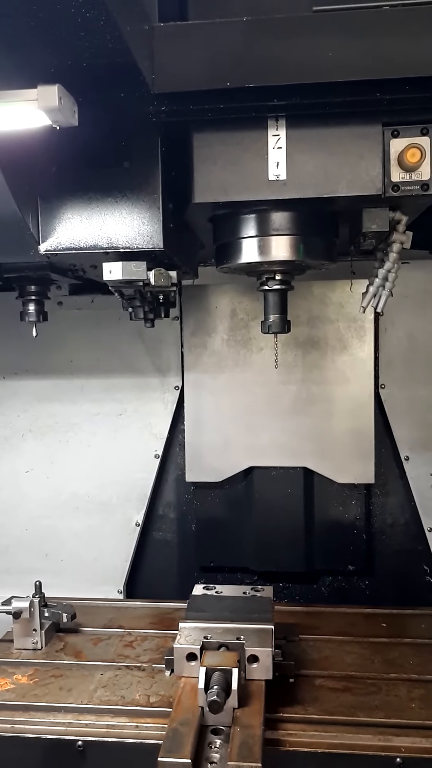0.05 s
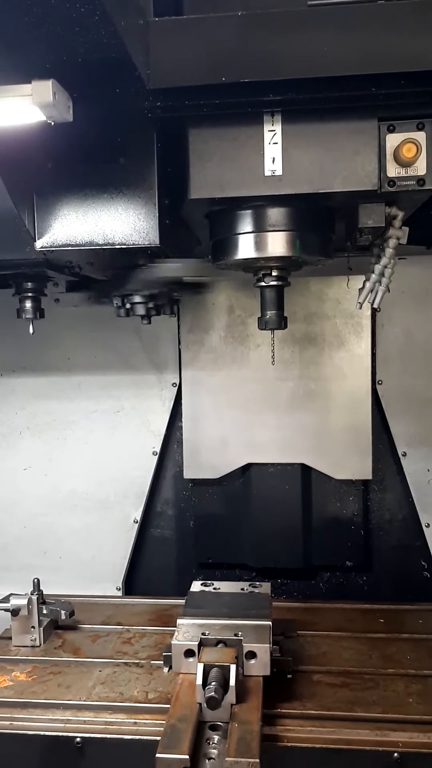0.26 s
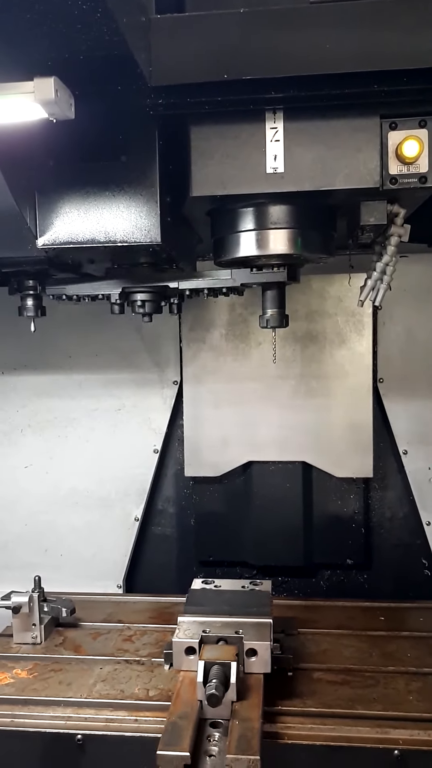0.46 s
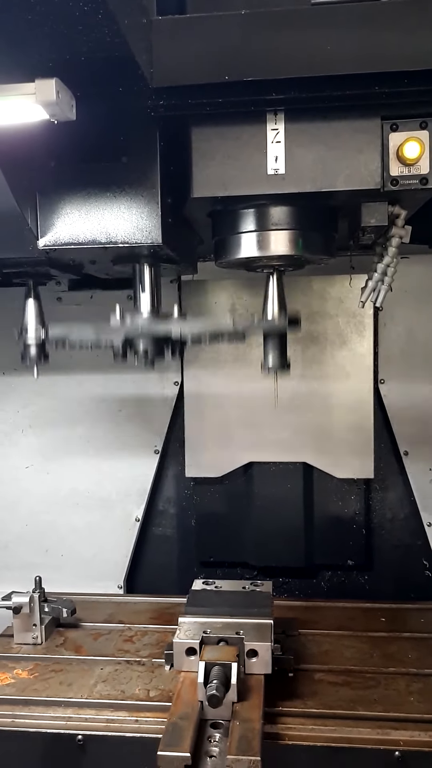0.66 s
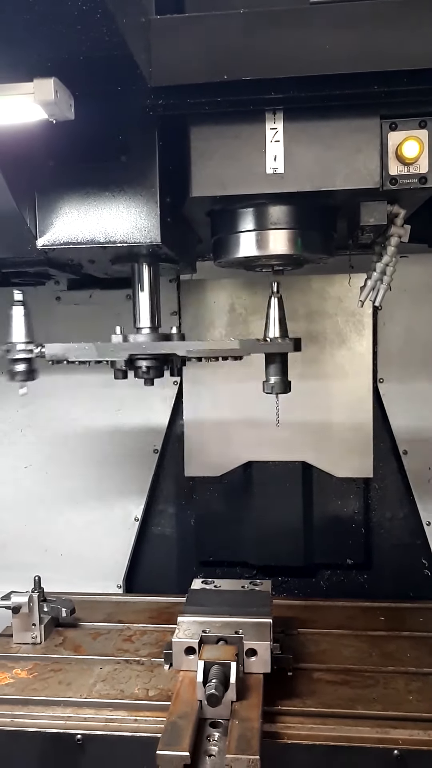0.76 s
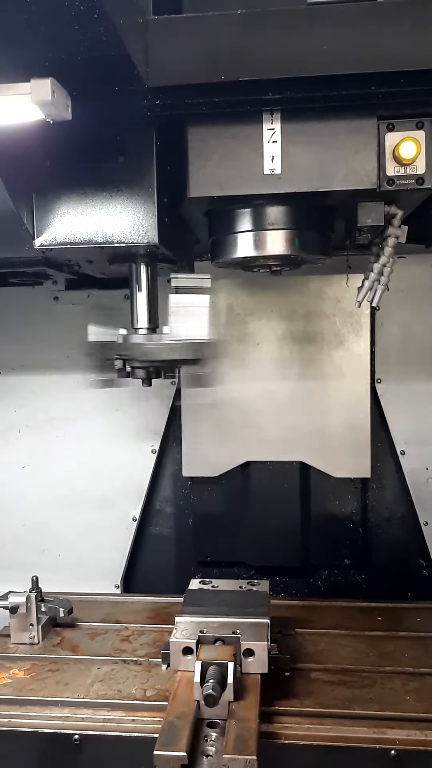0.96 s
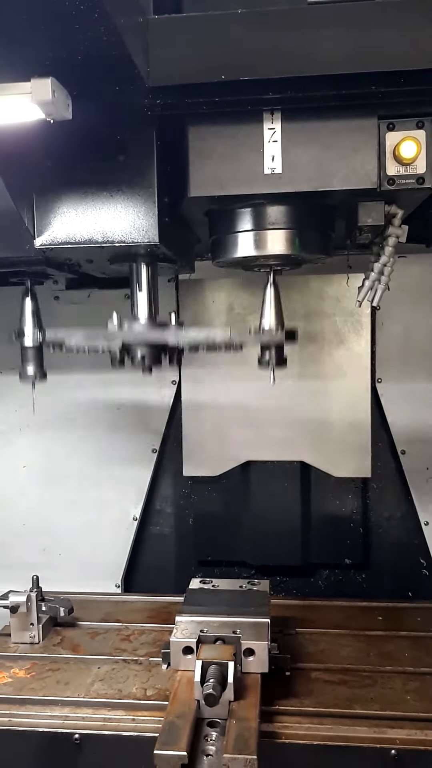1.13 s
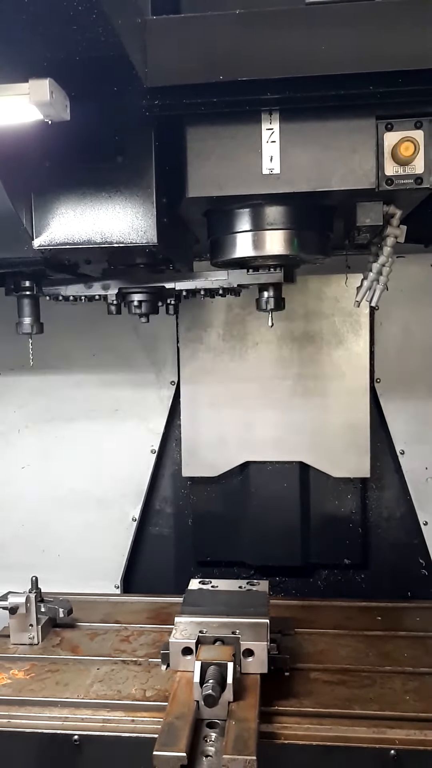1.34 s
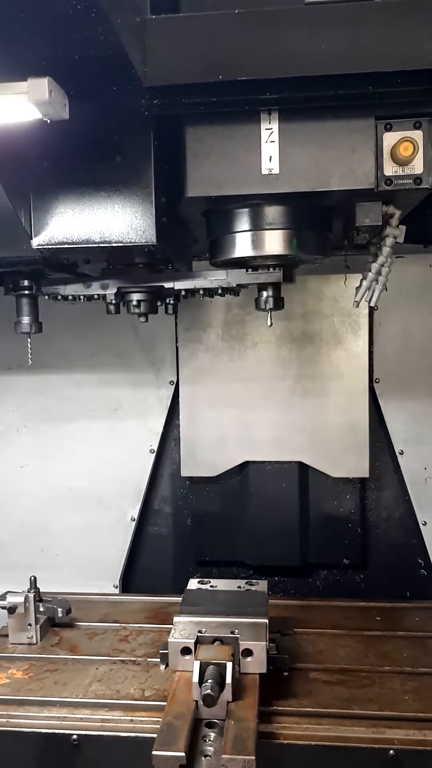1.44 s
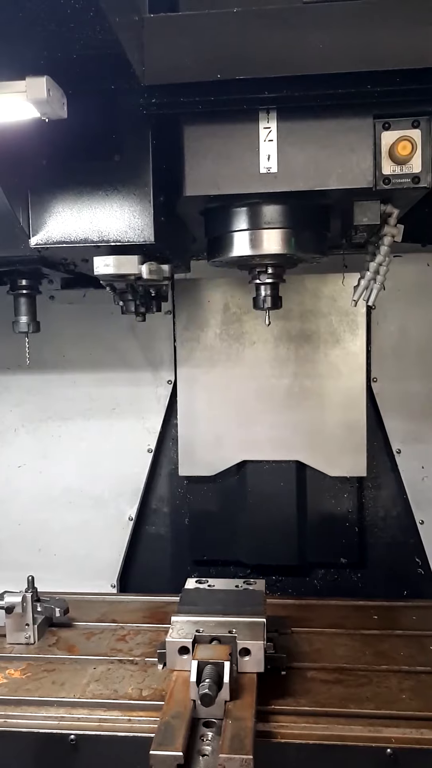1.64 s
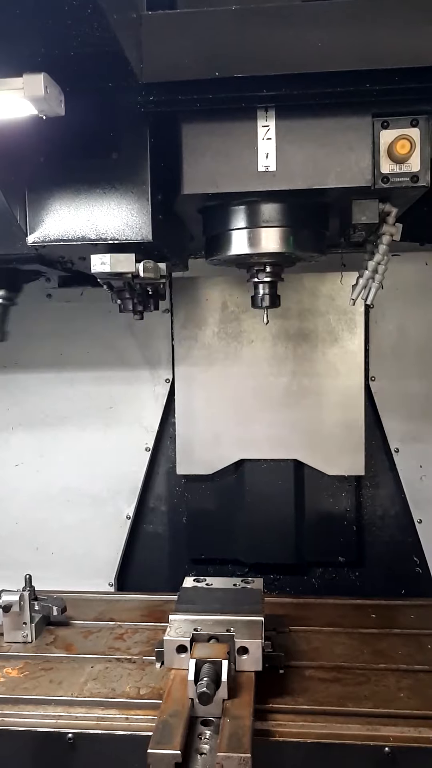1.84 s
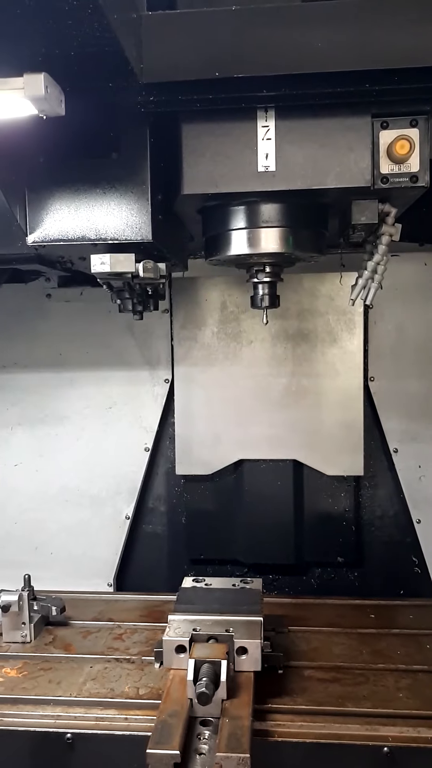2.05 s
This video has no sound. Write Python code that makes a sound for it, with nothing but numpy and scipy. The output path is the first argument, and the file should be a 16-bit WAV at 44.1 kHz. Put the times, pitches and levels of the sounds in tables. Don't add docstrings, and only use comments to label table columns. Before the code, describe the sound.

Machining centre tool changer clanks and grips, blasts loud compressed air, then clamps with metallic clunks

```python
import sys
import numpy as np
from scipy import signal
from scipy.fft import rfft, irfft, next_fast_len
from scipy.io import wavfile
from scipy.ndimage import uniform_filter1d

SR = 44100
rng = np.random.default_rng(int(sys.argv[2]) if len(sys.argv) > 2 else 0)


def voltage_ratio(level):
    return 10 ** (np.asarray(level, float) / 20)


def master_out(mix):
    frames = np.transpose(np.atleast_2d(mix))
    ceiling = np.clip(frames, -1, 1)
    pcm = np.round(ceiling * 32767).astype(np.int16)
    wavfile.write(sys.argv[1], SR, pcm)


N = 92610

# time_s, level_db, extra_midrange_db
BLAST_LEVEL = [(.55, -38, -13), (.62, -40, 2), (.645, -29.5, 0.5), (.7, -29.5, 6), (.78, -29.5, 4),
               (.84, -28.5, 1), (1.02, -28, -0.5), (1.13, -29, -1), (1.3, -28.5, 1.5), (1.42, -27.5, -1.5),
               (1.45, -33.5, 1), (1.52, -35.5, 2), (1.61, -36.5, 1.5), (1.65, -40.5, 4), (1.74, -59, 10)]
# freq_hz, density_db
BLAST_COLOUR = [(120, -67), (200, -23.5), (774, -13), (1220, -12.5), (2680, -13), (5280, -7), (8490, -1),
                (9300, -7.5), (15800, -7.5)]
# freq_hz, width_hz,
# gain_db
BLAST_PEAKS_AND_DIPS = [(2660, 890, 8.5), (1260, 53, -9), (4360, 390, 5), (6080, 310, 5.5), (7744, 500, 8),
                        (8570, 440, 6.5), (9400, 350, -0.5), (10120, 460, 8), (12700, 500, 1),
                        (13200, 400, -12), (14250, 1450, -12.5), (14370, 880, 12.5)]
LOW_SWELL_SHARE = 0.46

# time_s, level_db
WHISTLE_LEVEL = [(.54, -39), (.62, -38), (.67, -34.5), (.75, -32.5), (.85, -35.5), (1.0, -36.5),
                 (1.07, -38), (1.16, -35.5), (1.23, -32), (1.34, -37), (1.4, -31), (1.455, -22.5),
                 (1.5, -26.5), (1.53, -38), (1.63, -38)]
# time_s, pitch_hz
WHISTLE_PITCH = [(.54, 12380), (.66, 12550), (.8, 12620), (1.0, 12670), (1.2, 12720), (1.36, 12725),
                 (1.44, 12625), (1.63, 12610)]
# centre_s, length_s, depth_db
WHISTLE_BREAKS = [(.55, .02, -4), (0.584, .008, -8), (.61, .006, -8), (.635, 0.02, -3), (0.71, .006, -10),
                  (0.782, 0.0095, -12), (0.827, 0.0086, -23), (0.91, 0.0051, -8), (1.02, 0.012, -21),
                  (1.065, .014, -14), (1.108, .008, -12), (1.194, 0.0051, -9), (1.27, .006, -6),
                  (1.365, 0.012, -12), (1.484, 0.0044, -4), (1.524, 0.0053, -9), (1.565, 0.011, -8),
                  (1.605, .008, -8), (1.63, .012, -5)]
# time_s, level_db
EMPTY_TAPER_LEVEL = [(1.09, -38), (1.135, -26), (1.16, -39), (1.205, -26), (1.24, -36), (1.27, -24.5),
                     (1.285, -34), (1.298, -20.5), (1.32, -31), (1.345, -30.5), (1.368, -27), (1.39, -32.5),
                     (1.43, -32)]
# time_s, pitch_hz
EMPTY_TAPER_PITCH = [(1.09, 8500), (1.135, 8450), (1.16, 8750), (1.21, 8690), (1.27, 8660), (1.3, 8490),
                     (1.345, 8600), (1.37, 8570), (1.43, 8750)]
# start_s, length_s, pitch_hz, level_db
SQUEALS = [
    (1.337, 0.018, 2746, -26.5),
    (1.354, .011, 2730, -25),
    (1.364, 0.024, 2865, -27.5),
    (1.385, 0.027, 3050, -37),
    (1.415, 0.018, 6100, -26.5),
    (1.269, 0.092, 545, -46.5),
]

# time_s, level_db
MESH_LEVEL = [(.71, -47.5), (.82, -40.5), (.9, -47), (1.0, -47.5), (1.055, -58), (1.11, -46.5), (1.2, -49),
              (1.33, -46), (1.39, -56)]
# time_s, pitch_hz
MESH_PITCH = [(.71, 750), (.83, 780), (.88, 795), (.92, 760), (1.0, 770), (1.09, 790), (1.2, 775),
              (1.3, 745), (1.39, 780)]
# pitch_hz, width_hz, level_db
GEAR_TONES = [(938, 34, -57), (1712, 95, -52.5), (119.8, 9.3, -73.5), (212.3, 16, -62), (42.5, 47, -64)]
GEAR_PATCH_DB = 1.8
SWING_START_S, SWING_STOP_S, SWING_RAMP_S = 0.68, 1.402, 0.046

# pitch_hz, level_db, t60_s
POT_MODES = [(437, -9, .11), (533, -2, .15), (600, -6, .1), (690, -2, .1), (780, -1, .12), (880, -2, .09),
             (1000, -8, .07), (1290, -14, .09)]
# pitch_hz, level_db, t60_s
GRIPPER_MODES = [(862, 10, 0.099), (1098, -1, .1), (1600, 6, 0.13), (2320, 5, 0.15), (2800, 4, 0.065),
                 (3330, 2, .06)]
# pitch_hz, level_db, t60_s
ARM_MODES = [(169, -14.5, 0.17), (348, -7, 0.26), (392.8, 1, 0.28), (426.5, -2, 0.29), (640, -13, 0.11),
             (927, -13, 0.15), (1110, -12, 0.091), (1570, -3, 0.044)]
# pitch_hz, level_db, t60_s
CLAMP_MODES = [(286, -14, .4), (400, -2, .45), (432, -2, .33), (584, -1, .25), (518, -8, .3), (824, 3, .35),
               (895, -3, .05), (1340, -15, .12)]
# pitch_hz, level_db, t60_s
FRAME_MODES = [(81.5, -7.5, 0.44), (124.8, 0, 0.56), (157.8, 0.5, 0.17), (222.4, -8, 0.18)]
# start_s, ring_db, rattle_s, crack_db
POT_BLOWS = [
    (0.196, -37.5, 0.072, -37),
    (1.769, -51, 0.066, -42.5),
    (1.807, -54, 0.069, -58),
    (1.924, -63, 0.016, -83),
]
# start_s, ring_db, rattle_s, crack_db
GRIPPER_BLOWS = [
    (.452, -38, 0.0089, -60),
    (0.469, -47, .012, -51),
    (0.487, -48, 0.016, -65),
]
# start_s, ring_db, rattle_s, crack_db
ARM_BLOWS = [
    (0.438, -67, 0.0064, -30),
    (0.461, -43, 0.016, -34),
    (0.486, -31.5, 0.0058, -48),
    (0.519, -33.5, 0.019, -46),
    (0.574, -38, 0.083, -56),
]
# start_s, ring_db, rattle_s, crack_db
CLAMP_BLOWS = [
    (1.401, -47.5, 0.3, -36.5),
    (1.53, -38, 0.027, -35),
    (1.6, -74, 0.11, -42),
]
# start_s, ring_db, rattle_s, crack_db (the thuds are too dull to crack)
FRAME_BLOWS = [
    (0.196, -77, 0.011, -80),
    (0.431, -42.5, 0.048, -68),
    (0.624, -40.5, 0.094, -70),
    (1.398, -56, 0.012, -70),
    (1.439, -42, 0.069, -70),
    (1.54, -47.5, 0.24, -70),
    (1.765, -48.5, 0.0069, -66),
]
CONTACT_RISE_SHARE, METAL_LOW_CUT_HZ = 0.13, 35
MODE_SPREAD, MODE_SPREAD_HZ = 0.035, 8

# freq_hz, density_db
CRACK_COLOUR = [(120, -34), (200, -13.5), (681, -7.5), (879, -6), (1730, -13.5), (3220, -9), (5280, -18),
                (7740, -5.5), (15800, -28.5)]
CRACK_T60_S, CRACK_T60_SLOPE = 0.47, -0.46

# freq_hz, density_db
VENT_COLOUR = [(18, -13), (30, 0.5), (258, -15), (326, -27), (1210, -29), (1310, -12), (6310, -9.5),
               (7780, -7), (15800, -21.5)]
VENT_START_S, VENT_RISE_S, VENT_FALL_S = 1.748, 0.027, 0.077
VENT_PUFF_DB, VENT_HOLD_DB = -35.5, -44

# freq_hz, density_db
LEAK_COLOUR = [(18, -57), (30, -21), (188, -10), (326, -19), (1420, -22), (2100, -17), (5540, -18),
               (7990, -13.5), (15800, -26)]
LEAK_DB = -47.5
LEAK_RING = (8040, 1500, 5.9)   # freq_hz, width_hz, gain_db

# freq_hz, likeness_0_to_1
PORT_LIKENESS = [(60, 1), (400, 0.8), (800, 0.34), (1500, 0), (3000, 0), (8000, 0.93), (13000, 0)]
# freq_hz, left_minus_right_db
PORT_BALANCE = [(60, 1), (150, -2), (380, -1.5), (950, 0), (2380, -4), (5980, -5), (15000, 5.5)]
LEFT_LEAD_S = 0.00012
STANDING_WAVE_DB, STANDING_WAVE_HZ = 2.0, 45
CABINET_T60_S, CABINET_DB = 0.35, -11


def rms_one(x):
    return x / np.sqrt(np.mean(x ** 2) + 1e-20)


def in_time(rows):
    s, *columns = np.transpose(rows)
    t = np.arange(N) / SR
    gate = np.clip(np.minimum(t - s[0], s[-1] - t) / 0.02, 0, 1)
    return [gate] + [np.interp(t, s, column) for column in columns]


def at_hz(points, hz):
    points = np.array(points)
    return np.interp(np.log(hz + 1), np.log(points[:, 0]), points[:, 1])


def drift(rate):
    r = np.exp(-80 * np.pi * rate / SR)
    noise = rng.standard_normal(N // 40 + 2002)
    slow = signal.lfilter([1], [1, -2 * r, r * r], noise)[2000:]
    return np.interp(np.arange(N) / 40, np.arange(len(slow)), rms_one(slow))


def resonate(x, hz, width_hz):
    r = np.exp(-np.pi * width_hz / SR)
    poles = [1, -2 * r * np.cos(2 * np.pi * hz / SR), r * r]
    return signal.lfilter([(1 - r * r) / 2, 0, (r * r - 1) / 2], poles, x)


def stereo_noise(colour, peaks, band_gain):
    hz = np.arange(N // 2 + 1) * SR / N
    db = at_hz(colour, hz) + sum(gain / (1 + (2 * (hz - f) / w) ** 2) for f, w, gain in peaks)
    width = int(STANDING_WAVE_HZ * N / SR)
    ripple = uniform_filter1d(rng.standard_normal(len(hz)), width)
    db = db + STANDING_WAVE_DB * rms_one(uniform_filter1d(ripple, width))

    mid, side = rfft(rng.standard_normal((2, N)))
    alike = np.clip(at_hz(PORT_LIKENESS, hz), 0, 1)
    sign = np.array([[1], [-1]])
    lead = np.exp(1j * np.pi * hz * LEFT_LEAD_S * sign)
    balance = voltage_ratio(sign * at_hz(PORT_BALANCE, hz) / 2)
    both = voltage_ratio(db) * lead * balance * (np.sqrt(1 + alike) * mid + sign * np.sqrt(1 - alike) * side)
    scale = np.sqrt(np.mean(irfft(both, N).mean(axis=0) ** 2))

    place = 2 * np.log2(hz / 40 + 1e-9)
    out = 0
    for k in range(-1, 18):
        window = np.cos(np.pi / 2 * np.clip(place - k, -1, 1)) ** 2
        out = out + band_gain(40 * 2 ** (k / 2)) * irfft(both * window, N)
    return out / scale


def blast():
    gate, db, midrange_db = in_time(BLAST_LEVEL)
    gust = drift(40.0)

    def band_gain(hz):
        share = 1 if hz > 2000 else LOW_SWELL_SHARE
        swell = np.clip(midrange_db, -9, 9) * (hz < 4600) * share
        return voltage_ratio(swell + 0.5 * gust + 1.1 * drift(30.0) + 1.0 * drift(6.0))

    return gate * voltage_ratio(db) * stereo_noise(BLAST_COLOUR, BLAST_PEAKS_AND_DIPS, band_gain)


def whistle(pitch, level, fade_db, wander_hz, left_db):
    gate, db = in_time(level)
    hz = in_time(pitch)[1]
    turn = 2 * np.pi * np.cumsum(hz + wander_hz * drift(76.0)) / SR
    shared_fade = drift(46.0)
    ports = []
    for sign in (1, -1):
        fade = fade_db * (0.6 * shared_fade ** 2 + 0.4 * drift(15.0) ** 2)
        level_now = np.sqrt(2) * gate * voltage_ratio(db + sign * left_db / 2 - fade)
        ports.append(level_now * np.sin(turn + 0.073 * sign + 0.17 * drift(18.0)))
    return np.array(ports)


def whistle_breaks():
    t = np.arange(N) / SR
    return voltage_ratio(sum(db * np.exp(-((t - s) / length) ** 2) for s, length, db in WHISTLE_BREAKS))


def squeals():
    t = np.arange(N) / SR
    out = np.zeros(N)
    for s, length, hz, db in SQUEALS:
        swell = np.sin(np.pi * np.clip((t - s) / length, 0, 1))
        out += voltage_ratio(db) * swell * np.sin(2 * np.pi * hz * t + 1.66 * drift(73.0))
    return out


def gears():
    t = np.arange(N) / SR
    tones = np.zeros(N)
    for hz, width_hz, db in GEAR_TONES:
        patches = voltage_ratio(db + GEAR_PATCH_DB * drift(7.5))
        rough = resonate(resonate(rng.standard_normal(N), hz, width_hz), hz, width_hz)
        tones += patches * rms_one(rough)
    return tones * np.clip(np.minimum(t - SWING_START_S, SWING_STOP_S - t) / SWING_RAMP_S, 0, 1)


def struck(modes, blows):
    t = np.arange(N) / SR
    force, out = np.zeros(N), np.zeros(N)
    for s, db, rattle, _ in blows:
        after = np.maximum(t - s, 0)
        rise = np.minimum(after / (CONTACT_RISE_SHARE * rattle), 1)
        force += voltage_ratio(db) * rise * np.exp(-after / rattle) / np.sqrt(rattle * SR)
    for hz, db, t60 in modes:
        r = voltage_ratio(-60 / (t60 * SR))
        push = force * rng.standard_normal((5, N)) + 1e-18
        steps = np.linspace(-1, 1, 5) + rng.uniform(-0.15, 0.15, 5)
        for k, step in enumerate(steps):
            w = 2 * np.pi * (hz + (MODE_SPREAD * hz + MODE_SPREAD_HZ) * step) / SR
            out += voltage_ratio(db) * signal.lfilter([0, np.sin(w)], [1, -2 * r * np.cos(w), r * r], push[k])
    return signal.sosfilt(signal.butter(2, METAL_LOW_CUT_HZ, "high", fs=SR, output="sos"), out)


def cracks(blows):
    t = np.arange(N) / SR

    def tail(hz):
        t60 = CRACK_T60_S * (hz / 2000) ** CRACK_T60_SLOPE
        return sum(voltage_ratio(db - 60 * np.clip(t - s, 0, 1) / t60) * np.clip((t - s) / 0.00073, 0, 1)
                   for s, _, _, db in blows)

    return stereo_noise(CRACK_COLOUR, [], tail)


def vent():
    t = np.maximum(np.arange(N) / SR - VENT_START_S, 0)
    pressure = voltage_ratio(VENT_HOLD_DB) + voltage_ratio(VENT_PUFF_DB) * np.exp(-t / VENT_FALL_S)
    flow = (1 - np.exp(-t / VENT_RISE_S)) * pressure
    return flow * stereo_noise(VENT_COLOUR, [LEAK_RING], lambda hz: voltage_ratio(1.0 * drift(21.0)))


def leak():
    return voltage_ratio(LEAK_DB) * stereo_noise(LEAK_COLOUR, [LEAK_RING], lambda hz: voltage_ratio(2.26 * drift(4.4)))


def cabinet(x):
    size = next_fast_len(N + SR)
    w = 2 * np.pi * np.arange(size // 2 + 1) / size
    lags = rng.uniform(0.008, 0.03, (2, 24, 1)) * SR
    loop = voltage_ratio(-60 * lags / SR / CABINET_T60_S) * np.exp(-1j * w * lags) / (1 + (w * SR / 40000) ** 2)
    wet = (loop / (1 - loop)).sum(axis=1) / 5
    shared = np.clip(at_hz(PORT_LIKENESS, w * SR / 2 / np.pi), 0, 1)
    wet = shared * wet.mean(axis=0) + (1 - shared) * wet
    direct = np.exp(0.5j * w * LEFT_LEAD_S * SR * np.array([[1], [-1]]))
    return irfft(rfft(x, size) * (direct + voltage_ratio(CABINET_DB) * wet), size)[:, :N]


def scene():
    metal = (struck(POT_MODES, POT_BLOWS) + struck(GRIPPER_MODES, GRIPPER_BLOWS)
             + struck(ARM_MODES, ARM_BLOWS) + struck(CLAMP_MODES, CLAMP_BLOWS)
             + struck(FRAME_MODES, FRAME_BLOWS))
    mesh = whistle(MESH_PITCH, MESH_LEVEL, fade_db=3.5, wander_hz=30.0, left_db=-1.5)
    air = blast() + leak() + vent()
    edge_tone = whistle(WHISTLE_PITCH, WHISTLE_LEVEL, fade_db=4.5, wander_hz=10, left_db=11)
    empty_taper = whistle(EMPTY_TAPER_PITCH, EMPTY_TAPER_LEVEL, fade_db=1.0, wander_hz=35.4, left_db=4.0)
    tones = whistle_breaks() * edge_tone + empty_taper
    boxed = cabinet(metal + gears() + squeals())
    crash = cracks(POT_BLOWS + GRIPPER_BLOWS + ARM_BLOWS + CLAMP_BLOWS)
    return boxed + crash + air + tones + mesh


def low_pass(x):
    return signal.sosfilt(signal.butter(12, 15960, fs=SR, output="sos"), x)


def record(dry):
    top_cut = signal.ellip(10, 0.5, 70, 15900, fs=SR, output="sos")
    mix = signal.sosfilt(top_cut, dry)
    return low_pass(mix)


dry = scene()
out = record(dry)
master_out(out)
```